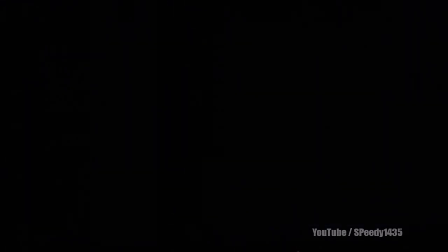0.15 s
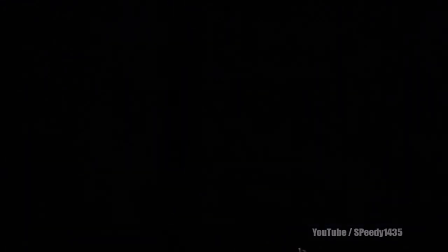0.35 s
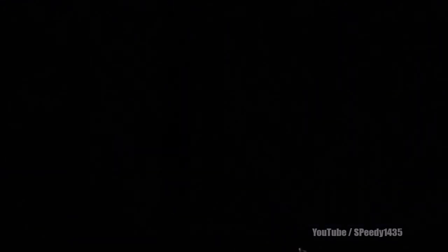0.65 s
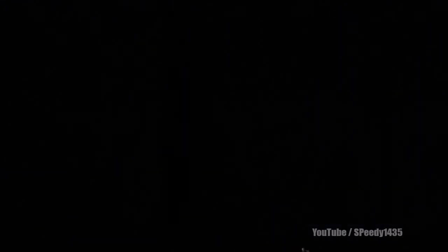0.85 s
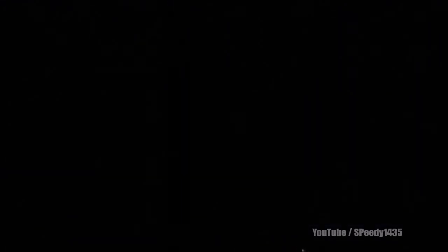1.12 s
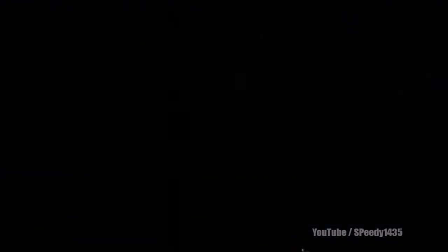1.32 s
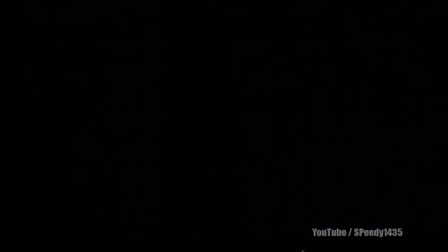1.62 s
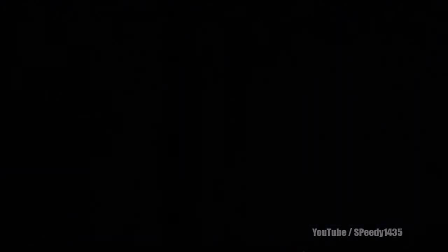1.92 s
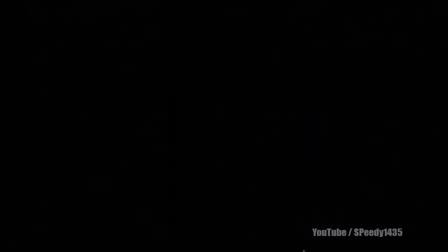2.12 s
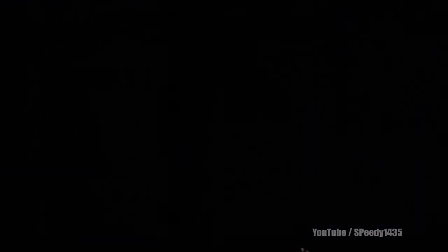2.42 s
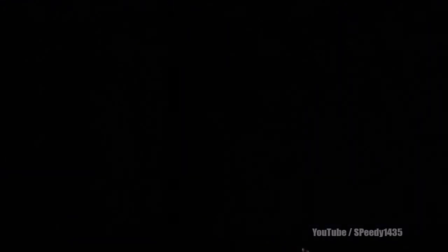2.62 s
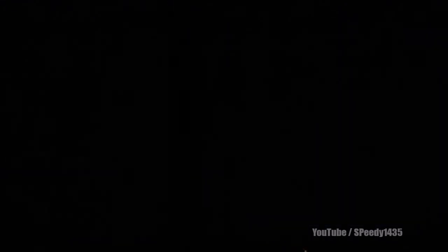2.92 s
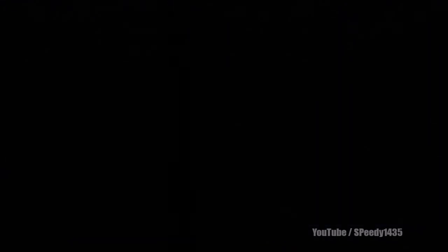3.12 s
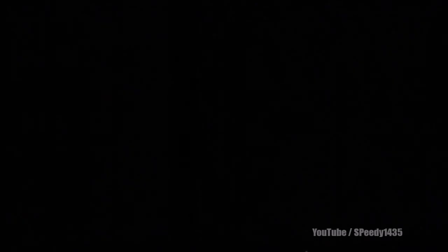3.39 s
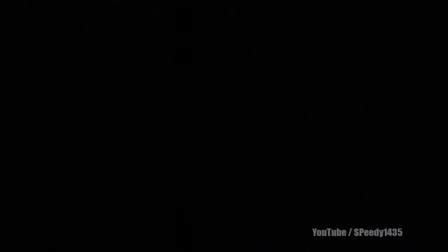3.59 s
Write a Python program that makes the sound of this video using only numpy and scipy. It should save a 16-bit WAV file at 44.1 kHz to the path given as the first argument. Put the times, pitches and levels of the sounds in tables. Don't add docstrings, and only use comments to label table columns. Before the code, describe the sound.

Thunder over steady, soft, distant rain hiss, outdoors at night. Almost only rain at first; from 0.3 s a dull rumble rises, strong from 0.8 s, with short sharp knocks between 0.7 and 1.7 s and the loudest peal around 1.6-1.7 s. It sinks to deep booms by 2.5 s, mutters weakly near 3.0 and 3.4 s, leaving rain. Faint high whine, tiny momentary treble dropouts.

```python
import sys
import numpy as np
from scipy import signal
from scipy.fft import rfft, irfft, next_fast_len
from scipy.io import wavfile
from scipy.ndimage import uniform_filter1d, map_coordinates

SR = 44100
rng = np.random.default_rng(int(sys.argv[2]) if len(sys.argv) > 2 else 0)


def volts(x):
    e = np.asarray(x, float) / 20
    return 10 ** e


def pcm_store(signal):
    levels = np.round(np.clip(np.atleast_2d(signal), -1, 1) * 32767)
    wavfile.write(sys.argv[1], SR, levels.astype(np.int16).T)


N = 165375

# t/s, strength/dB, boom over rumble/dB, brightness/(dB per octave)
THUNDER_ROLL = [(0, -43.5, 5.5, 5.5), (.32, -37, 1.5, 1), (.39, -31.5, -4.5, 3), (.78, -24.5, -5.5, 0.2),
                (1.0, -24.5, -2.5, 1.8), (1.2, -24.5, -1, 3.5), (1.3, -28, -6, 1), (1.43, -23, -4, 0.5),
                (1.53, -27.5, -3.5, 4.5), (1.7, -20, -6, -3), (1.92, -29.5, 1.5, 4), (2.13, -28.5, -6, 0),
                (2.22, -31.5, -1, 1), (2.33, -28.5, 1.5, -1.6), (2.55, -36, 1, -2), (2.83, -36.5, -0.5, 4),
                (2.99, -33, 2, 1.2), (3.13, -42, 3.5, 6)]


def unit(x):
    return x / np.sqrt(np.mean(x ** 2) + 1e-20)


def along(points, hz):
    f, v = np.transpose(points)
    return np.interp(np.log(hz + 1), np.log(f + 1), v)


def wobble(rate_hz):
    return map_coordinates(rng.standard_normal(400), [np.arange(N) * rate_hz / SR])


def filtered(x, response):
    m = next_fast_len(N + SR // 2)
    spectrum = rfft(x, m) * response(np.fft.rfftfreq(m, 1 / SR))
    return irfft(spectrum, m)[..., :N]


def scatter(per_s, spread_db):
    chance, size = rng.random(N), rng.exponential(size=N)
    sign = rng.choice([-1, 1], size=N)
    return unit((chance < per_s / SR) * sign * volts(spread_db * size))


def steady(x, hold_s, firm):
    size = int(hold_s * SR)
    power = uniform_filter1d(uniform_filter1d(x ** 2, size=size), size=size)
    slow = np.abs(power) + 1e-9
    return unit(x / slow ** (firm / 2)) * np.sqrt(np.mean(x ** 2))


def swell(s, hz, db, half_s, turn):
    t = np.arange(N) / SR - s
    bell = np.exp(-(t / half_s) ** 2)
    return bell, np.sqrt(2) * volts(db) * bell * np.sin(2 * np.pi * (hz * t + turn))


def whine():
    # f/Hz, level/dB rms
    whine_tones = [(7854, -78.5), (7881, -77), (11795, -78), (11823, -87)]
    # f/Hz, width/Hz, level/dB rms
    whine_skirts = [(7870, 160, -77.5), (11800, 120, -98)]
    t, wobble_db = np.arange(N) / SR, 0.9
    out = np.zeros(N)
    for hz, db in whine_tones:
        out += np.sqrt(2) * volts(db + wobble_db * wobble(4)) * np.sin(2 * np.pi * hz * t)
    for hz, width_hz, db in whine_skirts:
        noise = filtered(rng.standard_normal(N), lambda f: np.exp(-((f - hz) / width_hz) ** 2))
        out += volts(db) * unit(noise)
    return out


def mic_rumble():
    # f/Hz, level/(dB per Hz)
    drift_spectrum = [(8, -6), (15, 0), (24, -3), (32, -8), (40, -16), (50, -40)]
    level_db, growth = -55.5, 0.12
    s, strength_db = np.transpose(THUNDER_ROLL)[:2]
    lift_db = growth * np.interp(np.arange(N) / SR, s, strength_db - strength_db.mean())
    drift = filtered(rng.standard_normal(N), lambda f: volts(along(drift_spectrum, f)) * (f > 5))
    return volts(level_db + lift_db) * unit(drift)


def rain():
    # f/Hz, level/(dB per Hz)
    rain_spectrum = [(760, -30), (1300, 0), (2600, -1.3), (3600, -5.2), (5000, -8.5), (7000, -12.2),
                     (10000, -18.5), (13000, -25), (15000, -31)]
    # f/Hz, lift/dB
    rain_low = [(100, -3), (400, -9), (800, 4), (1300, 2.2)]
    level_db, patchy_db, drop_share = -48, 0.8, 0.22
    z = signal.stft(rng.standard_normal(N), nperseg=512)[2]
    patches = uniform_filter1d(uniform_filter1d(rng.standard_normal(z.shape), 6, 0), 10, 1)
    hiss = unit(signal.istft(z * volts(patchy_db * unit(patches)), nperseg=512)[1][:N])
    drops = scatter(per_s=6000, spread_db=1.5)
    mix = np.sqrt(drop_share) * drops + np.sqrt(1 - drop_share) * hiss
    colour = lambda f: volts(along(rain_spectrum[1:], f) + along(rain_low, f))
    return volts(level_db) * unit(filtered(mix, colour))


def shocks():
    peal_db, peal_rate_hz = -2.4, 14
    echo_t60_s, echo_db, renew_s = 1, 3.5, 0.25
    direct = scatter(per_s=2500, spread_db=1.5) * volts(peal_db * wobble(peal_rate_hz))
    t, step, echo = np.arange(SR // 2) / SR, int(renew_s * SR), np.zeros(N + SR)
    for start in range(0, N, step):
        tail = rng.standard_normal(len(t)) * volts(-60 * t / echo_t60_s)
        answer = signal.fftconvolve(direct[start:start + step], tail / np.linalg.norm(tail))
        echo[start:start + len(answer)] += answer
    return direct + volts(echo_db) * echo[:N]


def thunder():
    # f/Hz, level/(dB per Hz)
    rumble_spectrum = [(100, -8), (135, -8.5), (185, -2), (260, -5), (400, -11.5), (630, -16), (900, -25.5),
                       (1400, -43.5), (2500, -84)]
    boom_spectrum = [(30, -34), (45, -18), (52, -4), (70, -7.5), (92, -7.5), (120, -16), (160, -21)]
    # f/Hz, width/Hz, level/dB
    hollows = [(58, 8.7, -5), (65, 2.7, -0.5), (84.6, 16, -3.5), (160, 27, 4), (204.6, 25, 4.5),
               (266, 12.5, 3), (343.5, 4.1, 3), (366, 36, 5), (438, 14, 3.5), (466.4, 8, 1), (474, 54, 3.5),
               (584, 24, 3)]
    # t/s, rise/dB, width/s
    last_roll = [
        (3.41, 2.5, 0.07),
    ]
    pivot_hz, top_tilt = 255, 1.25
    t = np.arange(N) / SR
    s, *columns = np.transpose(THUNDER_ROLL)
    strength_db, boom_db, bright_db = [np.interp(t, s, c) for c in columns]
    for at, rise_db, width_s in last_roll:
        strength_db = strength_db + rise_db * np.exp(-((t - at) / width_s) ** 2)

    def ring(f):
        response = 1
        for hz, width_hz, db in hollows:
            loss = 1j * f * width_hz
            response = response + (volts(db) - 1) * loss / (hz * hz - f * f + loss)
        return response

    def highpass(x, hz):
        return filtered(x, lambda f: 1 / (1 + (hz / (f + 1)) ** 4))

    rumble = unit(filtered(shocks(), lambda f: ring(f) * volts(along(rumble_spectrum, f)) * (f > 90)))
    upper = highpass(rumble, pivot_hz)
    top = highpass(rumble, 2 * pivot_hz)
    bands = rumble - upper, upper - top, top
    low, middle, high = [steady(band, hold_s=0.074, firm=1.0) for band in bands]
    rumble = low + volts(bright_db) * middle + volts(top_tilt * bright_db) * high
    boom = unit(filtered(shocks(), lambda f: ring(f) * volts(along(boom_spectrum, f)) * (f < 200)))
    boom = steady(boom, hold_s=0.078, firm=0.61)
    return volts(strength_db) * (rumble + volts(boom_db) * boom)


def peals(roll):
    # t/s, f/Hz, level/dB rms, length/s
    strong_peals = [(.47, 172, -36.5, 0.2), (.56, 214.3, -38.5, 0.36), (.6, 366, -30, 0.048),
                    (.82, 246.6, -33, 0.28), (.85, 342, -33.5, 0.063), (.88, 180.7, -28.5, 0.11),
                    (.9, 268, -32.5, 0.1), (.66, 130, -33, 0.15), (1.05, 149.7, -28.5, 0.11),
                    (1.12, 178, -33, 0.11), (1.15, 197.3, -30.5, 0.28), (1.15, 338.5, -35.5, 0.31),
                    (1.33, 367.4, -34, 0.23), (1.39, 90.6, -32.5, 0.36), (1.42, 209, -28.5, 0.069),
                    (1.46, 176, -25.5, 0.03), (1.59, 172.5, -19.5, 0.042), (1.62, 266, -36.5, 0.14),
                    (1.72, 163, -26.5, 0.047), (1.75, 68, -24, 0.06), (1.76, 207.5, -29.5, 0.086),
                    (1.83, 230, -30.5, 0.1), (1.918, 67, -28, 0.19), (2.072, 57.3, -30.5, 0.23),
                    (2.346, 56.4, -30.5, 0.13), (2.36, 172, -35, 0.19), (2.97, 176, -36.5, 0.12),
                    (3.017, 58, -39.5, 0.41), (2.97, 200.8, -43, 0.23), (3.37, 259.7, -43, 0.31)]
    ring_width_hz = 16.5
    flutter_db, flutter_rate_hz, flutter_full_hz = 1.5, 35, 200
    out = roll
    for (s, hz, db, length_s), turn in zip(strong_peals, rng.random(len(strong_peals))):
        bell, tone = swell(s, hz, db + 3.0, 0.46 * length_s, turn)
        flutter = volts(flutter_db * min(1, hz / flutter_full_hz) * wobble(flutter_rate_hz))
        replaced = filtered(roll, lambda f: np.exp(-((f - hz) / ring_width_hz) ** 2))
        out = out + flutter * tone - bell * replaced
    return out


def claps(roll):
    # t/s, peak/dB, sign
    sharp_shocks = [(.686, -15, -1), (.853, -13.5, -1), (.98, -17, -1), (1.054, -11, 1), (1.091, -13, -1),
                    (1.329, -14, -1), (1.405, -13, -1), (1.448, -12, 1), (1.498, -15, -1), (1.575, -11, -1),
                    (1.70, -14, -1)]
    half_width_s = 0.00087
    t, out = np.arange(N) / SR, roll
    for s, db, sign in sharp_shocks:
        u = (t - s) / half_width_s
        swing = sign * volts(db) * (1 - u ** 2) * np.exp(-u ** 2 / 2)
        out = out * (1 - 0.76 * np.exp(-u ** 2 / 8)) + swing
    return out


def scene():
    return (claps(peals(thunder())) + rain() + mic_rumble())[None]


def roll_off(x):
    return signal.sosfilt(signal.butter(12, 15170, fs=SR, output="sos"), x)


def record(dry):
    # t/s, hold/s, lowest lost f/Hz, depth 0-1, return/s
    dropouts = [
        (.1645, .001, 2750, .995, .012),
        (.8885, .001, 3200, .99, .011),
        (1.380, .001, 1250, .995, .012),
        (1.7255, .008, 1250, 1, .003),
        (1.828, .001, 3000, .995, .011),
        (2.9165, .001, 4000, .995, .012),
        (3.686, .001, 4200, .995, .012),
    ]
    # t/s, f/Hz, level/dB rms
    gap_tones = [(.1645, 4150, -62), (.166, 2010, -54), (1.38, 1650, -59), (1.38, 2500, -57),
                 (1.382, 3480, -60), (1.723, 1630, -56), (1.724, 2350, -55), (1.724, 2750, -57),
                 (1.824, 1350, -47), (1.825, 2080, -52), (2.915, 7050, -66)]
    top_hz, fade_s, fade_bend, gap_tone_s = 15020, 0.016, 1.5, 0.011
    t = np.arange(N) / SR
    x = filtered(dry + whine(), lambda f: f < top_hz)
    for s, hold_s, low_hz, depth, back_s in dropouts:
        ramp_s = np.where(t < s, fade_s, back_s)
        away = np.clip((np.abs(t - s) - hold_s / 2) / ramp_s, 0, 1)
        lost = depth * (1 - np.sin(np.pi / 2 * away) ** fade_bend)
        x = x - lost * filtered(x, lambda f: f > low_hz)
    for s, hz, db in gap_tones:
        x = x + swell(s, hz, db, gap_tone_s, 0)[1]
    return roll_off(x)


dry = scene()
out = record(dry)
pcm_store(out)
```